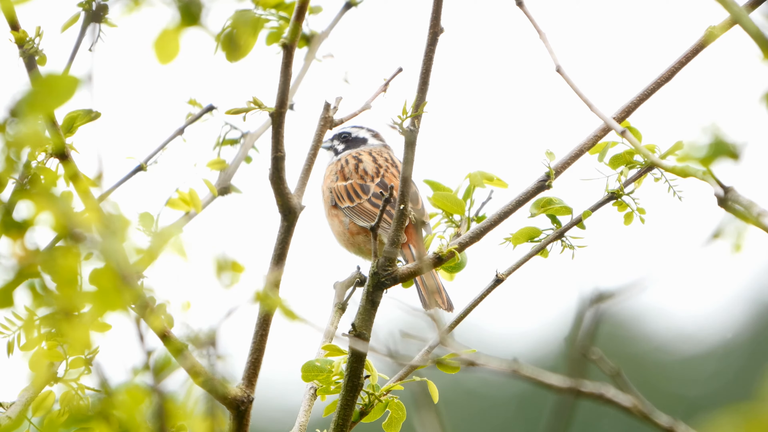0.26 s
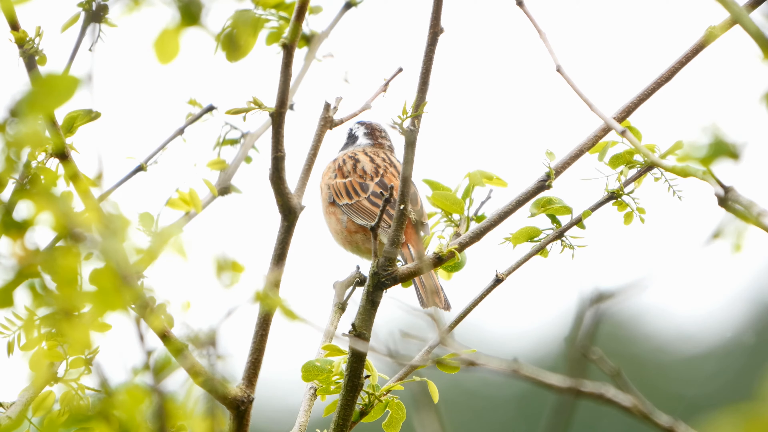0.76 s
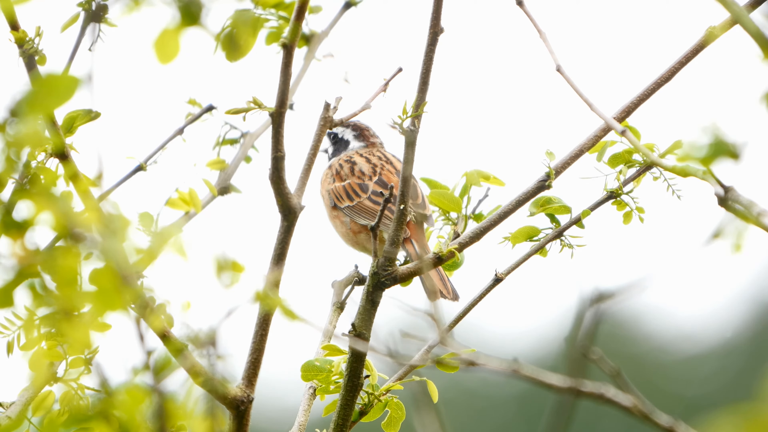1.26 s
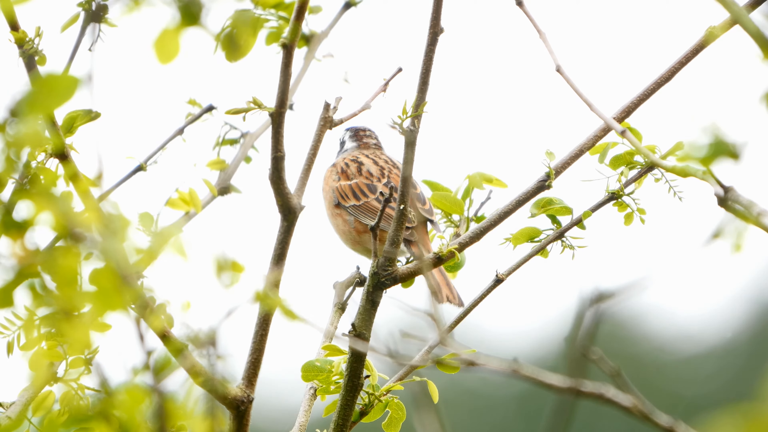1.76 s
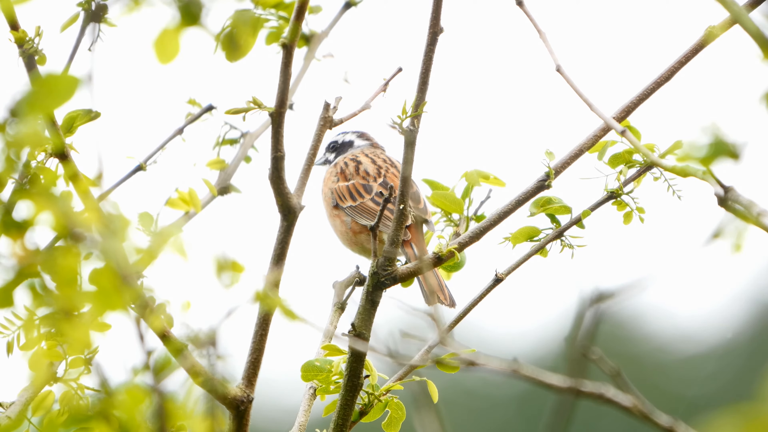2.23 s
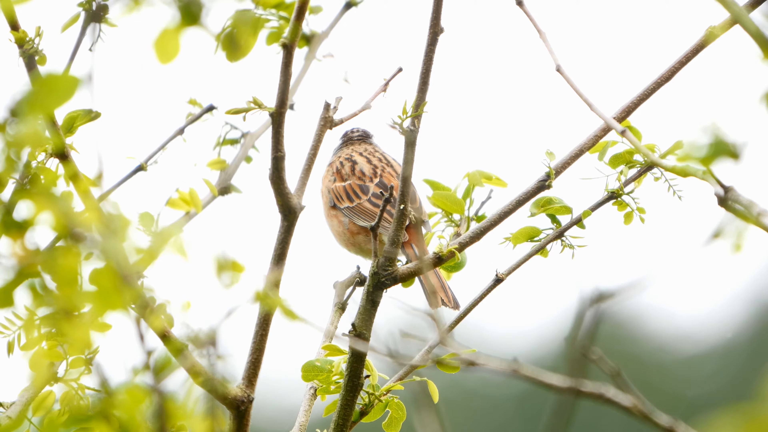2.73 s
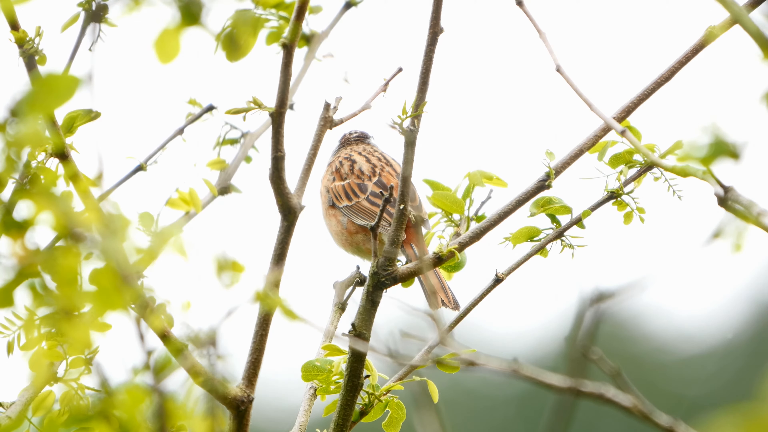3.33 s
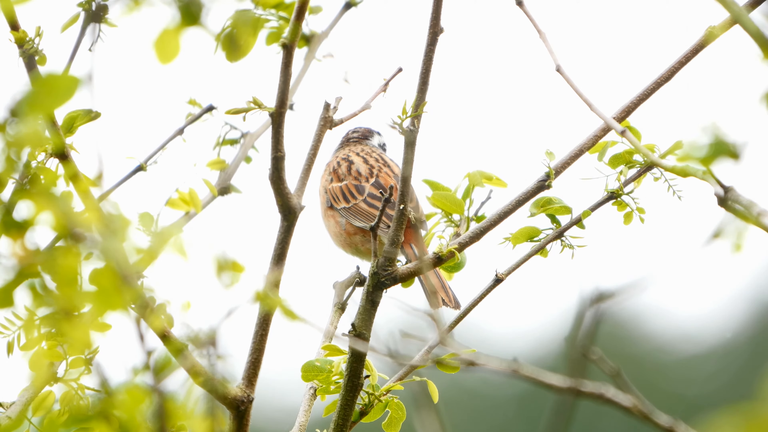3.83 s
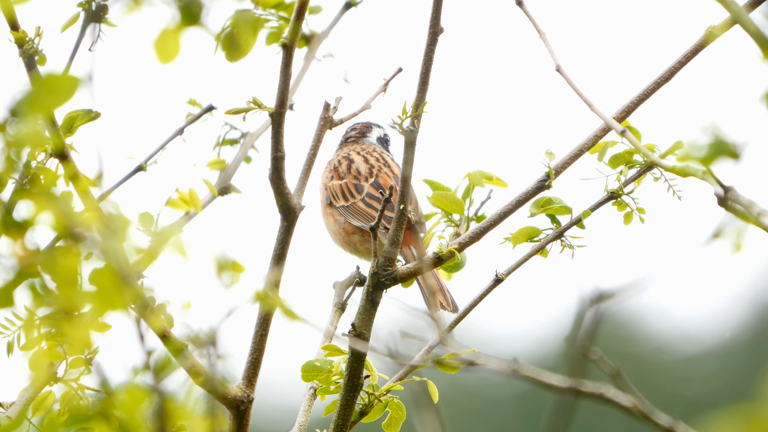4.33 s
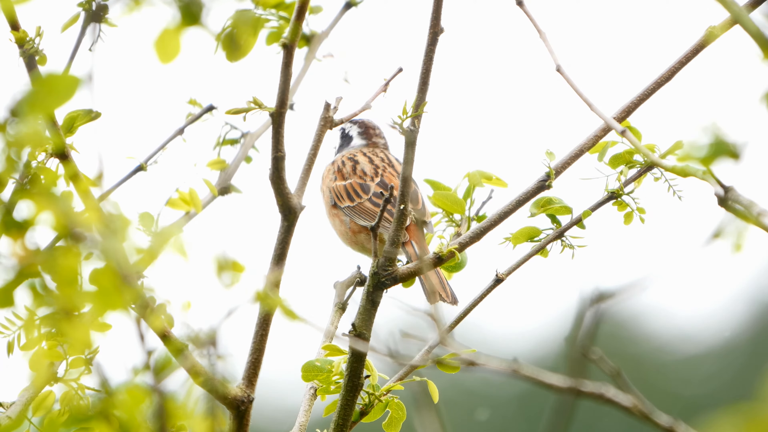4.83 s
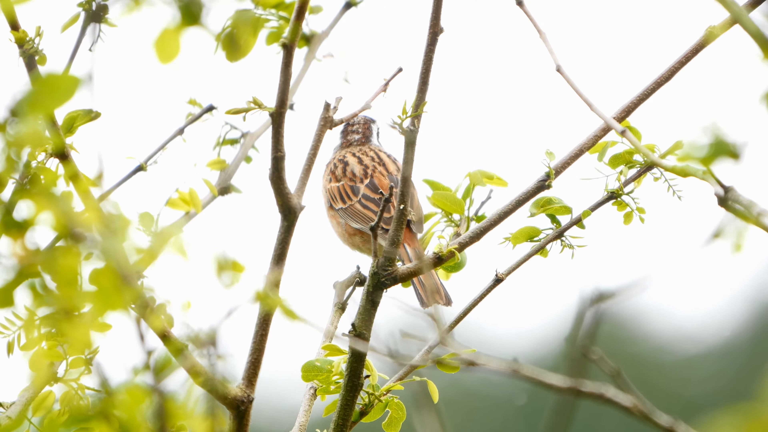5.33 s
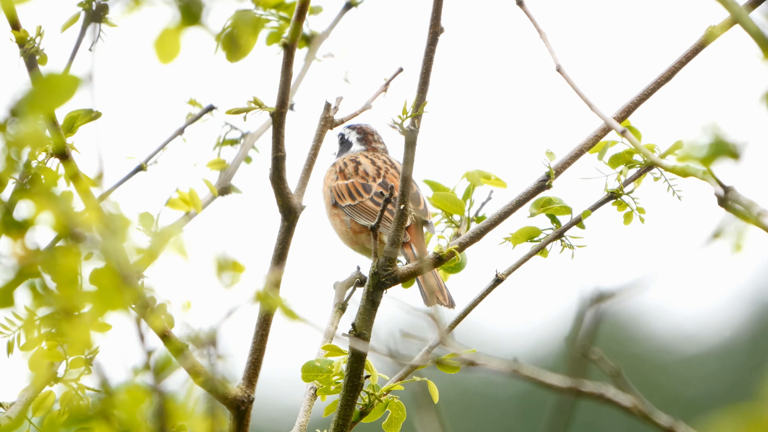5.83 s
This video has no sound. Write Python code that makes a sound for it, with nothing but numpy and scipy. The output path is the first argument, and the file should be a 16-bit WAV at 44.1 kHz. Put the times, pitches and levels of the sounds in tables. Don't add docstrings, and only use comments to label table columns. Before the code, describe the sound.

A quiet wooded valley, heard through one microphone: soft broad air hum, faint hiss, far traffic, a low drone and a blur of remote birdsong that slowly grows. At 0.4 s a small nearby bird begins with a chip, then an arched whistle, a downward slide and a strong, long sinking whistle at 0.8 s. Paired warbles and sharp peaks follow from 1.0 s, thin very high lisps around 1.3 s, then rising and hooked notes and a quick trill ending near 1.9 s. Trees leave a light smeared echo. From about 1.8 s farther birds whistle softly, with droops, plunges and arches; a distant vehicle swells around 2.5 s. From 3.75 s another bird pipes a regular, slowly rising row of low paired notes, while clearer arches sound until about 4.7 s. At 4.6 s the near bird repeats its bright phrase, reaching the trill around 6 s.

```python
import sys
import numpy as np
from scipy import signal
from scipy.fft import rfft, irfft, next_fast_len
from scipy.io import wavfile
from scipy.ndimage import uniform_filter1d

SR = 44100
rng = np.random.default_rng(int(sys.argv[2]) if len(sys.argv) > 2 else 0)


def store_pcm(level_fs):
    pcm = np.round(np.clip(level_fs, -1, 1) * 32767).astype(np.int16)
    wavfile.write(sys.argv[1], SR, np.atleast_2d(pcm).T)


def how_loud(loudness_db):
    steps = np.asarray(loudness_db, float) / 20
    return 10 ** steps


N = 268569

# time
# after the start in seconds [s], pitch [Hz], level under the syllable's peak [dB].
CHIP = [
    [(0, 5540, -31.5), (0.009, 5350, -9.5), (0.015, 4980, 0), (0.021, 4600, -3), (0.027, 4400, -5.5)],
]
ARCH = [
    [(0, 3680, -23), (0.019, 3920, -3.5), (0.035, 4120, -3.5), (0.049, 4180, 0), (0.06, 4283, -3),
     (0.067, 4175, -5.5), (0.073, 3940, -1.5), (0.081, 3600, -0.5)],
    [(0.082, 3640, -2), (0.085, 4890, -10.5), (0.089, 7200, -39)],
]
SLIDE = [
    [(0, 8150, -40), (0.013, 7270, -42), (0.025, 5980, -14), (0.043, 5610, -3.5), (0.073, 5262, 0.8),
     (0.097, 5103, -3.5)],
]
TICK = [
    [(-0.004, 4900, -16), (0.001, 5010, -1.5), (0.006, 5400, 0), (0.012, 5800, -5.5)],
]
LONG = [
    [(-0.003, 4500, -13.5), (0.001, 4900, -6), (0.01, 4286, -7.5), (0.03, 4010, -6.5), (0.065, 3680, 0.5),
     (0.105, 3640, -2.5), (0.13, 3450, -1), (0.142, 3260, -19)],
]
WARBLE = [
    [(0, 6160, -32), (0.012, 6010, -10.5), (0.021, 5540, -1.5), (0.03, 5380, 0), (0.038, 5130, 3),
     (0.047, 5020, -6)],
]
PEAK = [
    [(0, 4150, -10), (0.01, 4500, 3.5), (0.017, 5040, 1.5), (0.026, 4220, 1.2), (0.043, 3837, 0.5)],
]
LISP = [
    [(0, 7950, -23), (0.007, 7870, -9), (0.013, 7620, 0.5), (0.019, 6950, -25)],
    [(-0.001, 8320, -24), (0.007, 8560, -13), (0.013, 8860, -20)],
]
DART = [
    [(0, 10080, -22), (0.005, 7580, -3.5), (0.012, 7190, -4.5)],
]
RISE = [
    [(0, 4770, -24), (0.008, 4510, -10), (0.016, 4570, -6), (0.031, 4910, 1), (0.042, 5150, -1),
     (0.051, 5500, -3), (0.062, 5700, -6), (0.074, 5800, -10)],
]
HOOK = [
    [(0, 4720, -14), (0.005, 2680, -3), (0.009, 3560, -3), (0.016, 3740, -1), (0.022, 3620, 0),
     (0.027, 3100, -3), (0.034, 2200, -9)],
]
STEP = [
    [(-0.006, 6730, -30), (0.004, 6800, -10), (0.016, 6940, -2.5), (0.028, 7020, -2.5), (0.034, 6900, 1.5),
     (0.041, 6380, -2), (0.048, 6330, -2.5), (0.062, 6430, 0), (0.077, 6520, -7)],
]
TRILL = [
    [(0, 4460, -8), (0.004, 4480, -2), (0.008, 4460, 0), (0.012, 4200, -3), (0.017, 3740, -8)],
    [(0.011, 4470, -11), (0.015, 4470, -8), (0.022, 4450, -15)],
]
HOOP = [
    [(0, 10100, -21), (0.019, 9070, -7), (0.044, 8400, -3), (0.069, 8500, 1.5), (0.099, 9030, -4),
     (0.123, 9260, -10.5)],
]
SAGGING = [
    [(0, 4540, -13), (0.004, 4750, -5), (0.012, 4250, -5.5), (0.03, 3970, -3.5), (0.065, 3714, -2.5),
     (0.105, 3534, 2.5), (0.126, 3420, -9.5), (0.135, 3330, -15)],
]

# time
# after the start in seconds [s], pitch [Hz], level under the call's peak [dB].
BOW = [
    [(0, 3115, -13), (0.011, 3780, -2.5), (0.034, 4067, -1), (0.056, 4160, -1), (0.075, 4060, 3.5),
     (0.091, 3750, -1), (0.106, 3015, -5)],
]
STAIRS = [
    [(0, 6420, -11), (0.016, 6650, -14)],
    [(0.068, 7100, -14), (0.073, 4800, -6), (0.079, 2900, 0)],
]
CLIMB = [
    [(0, 2530, -3), (0.014, 3180, -5), (0.04, 3720, 1.5), (0.064, 4070, -4), (0.075, 3960, 0),
     (0.085, 3640, 4)],
]
DROOP = [
    [(0, 3150, -3), (0.03, 3156, -3), (0.05, 2720, -2), (0.068, 2468, -2)],
]
PLUNGE = [
    [(0, 4300, -18), (0.009, 3130, 3), (0.018, 2500, 1.5), (0.036, 1826, -4)],
]
LEAP = [
    [(0.002, 2430, 5), (0.005, 2550, 5), (0.011, 3100, -1), (0.017, 3750, 3), (0.02, 4500, -13),
     (0.025, 5600, -16)],
]
CURL = [
    [(0, 3010, 7), (0.013, 2220, 3), (0.023, 2600, -4.5), (0.033, 2240, -5)],
]
KINKED = [
    [(0, 3020, -6), (0.008, 3860, -1), (0.024, 3950, 1), (0.042, 4380, -4), (0.065, 4430, 2),
     (0.085, 4150, 1.5), (0.105, 3660, -2), (0.113, 3220, -11)],
]
SLOPE = [
    [(0, 3100, -6), (0.03, 3450, 0), (0.064, 4300, -4), (0.08, 4400, -1), (0.091, 4320, -10)],
]
SWOOP = [
    [(0, 2770, -13), (0.007, 3020, -1), (0.014, 3240, 0), (0.022, 3340, -1)],
]


def along(points, hz):
    f, v = np.transpose(points)
    return np.interp(np.log(hz + 1), np.log(f + 1), v)


def noise(gain, patchy_db):
    z = signal.stft(rng.standard_normal(N + 512), nperseg=512)[2]
    field = uniform_filter1d(rng.standard_normal(z.shape), size=5, axis=0)
    field = uniform_filter1d(field, size=12, axis=1)
    patchy = signal.istft(z * how_loud(patchy_db * field / field.std()), nperseg=512)[1][:N]
    m = next_fast_len(N)
    coloured = irfft(rfft(patchy, m) * gain(np.fft.rfftfreq(m, 1 / SR)), m)[:N]
    return coloured / coloured.std()


def flutter(top_hz, depth_db):
    return how_loud(depth_db * noise(lambda hz: hz < top_hz, patchy_db=0.0))


def swell(centre_s, width_s, db):
    return db * np.exp(-((np.arange(N) / SR - centre_s) / width_s) ** 2)


def hump(centre_hz, width_hz):
    return lambda hz: np.exp(-((hz - centre_hz) / width_hz) ** 2)


def valley():
    # frequency [Hz], level [dB per Hz].
    hum_spectrum = [(15, -51.5), (25, -34.5), (70, -10.5), (110, -9), (165, -7.5), (222, -15), (261, -4.5),
                    (436, -8.5), (978, -3.5), (1250, -7.5), (1470, -7.5), (2880, -15), (3980, -25),
                    (6640, -32), (15700, -38.5)]
    # centre [s], width [s], height [dB].
    drone_swells = [
        (2.76, 0.1, 5),
        (3.82, 0.086, 9.5),
        (0.92, 0.22, 1),
        (5.53, 0.4, 5.5),
    ]
    # centre [s], width [s], height [dB].
    chorus_swells = [
        (1, 0.12, 0),
        (5, 0.32, 0.5),
        (-3.7, 0.4, -2.5),
        (6, 0.13, -9),
    ]

    hum = how_loud(-46) * noise(lambda hz: how_loud(along(hum_spectrum, hz)), patchy_db=0.9)

    vehicle_db = swell(centre_s=2.53, width_s=0.39, db=8.5)
    traffic = how_loud(-60.5 + vehicle_db) * noise(hump(220, 77), patchy_db=0.5)

    drone_db = -61 + sum(swell(*row) for row in drone_swells)
    drone = how_loud(drone_db) * noise(hump(317.3, 26), patchy_db=2.0)

    grows_db_per_s = 0.97
    chorus_db = -56.5 + grows_db_per_s * np.arange(N) / SR + sum(swell(*row) for row in chorus_swells)
    chorus = how_loud(chorus_db) * noise(hump(2685, 1050), patchy_db=3)
    return hum + traffic + drone + chorus


def wood(x, wet_db, onset_s, depth, stir_db):
    # frequency [Hz], time to fall by 60 dB [s].
    decay = [
        (2000, 0.29),
        (4000, 0.75),
        (6500, 0.61),
        (9000, 0.085),
    ]
    hz, t, z = signal.stft(rng.standard_normal(SR), SR, nperseg=128)
    t60_s = depth * along(decay, hz)[:, None]
    tail = signal.istft(z * how_loud(-60 * t / t60_s), SR, nperseg=128)[1]
    tail *= 1 - np.exp(-np.arange(len(tail)) / SR / onset_s)
    tail *= flutter(200, 1.5)[:len(tail)]
    scatter = signal.fftconvolve(x, tail / np.linalg.norm(tail))[:N]
    return how_loud(wet_db) * flutter(170, stir_db) * scatter


def sung(shape, rows):
    return [np.array(stroke) * [length, pitch, 1] + [s, 0, db]
            for s, db, pitch, length in rows for stroke in shape]


def add_whistle(out, note, edge_s, glide_s, octave_db, warble_hz=0):
    s, hz, db = np.transpose(note)
    i = np.arange(int((s[0] - edge_s) * SR), min(N, int((s[-1] + edge_s) * SR)))
    t = i / SR
    age = t - s[0]
    pitch = uniform_filter1d(np.interp(t, s, hz), int(glide_s * SR) + 1, mode="nearest")
    warble_fade = np.clip((0.026 - age) / 0.02, 0, 1)
    pitch += warble_hz * np.cos(2 * np.pi * 188 * (age - 0.004)) * warble_fade
    phase = 2 * np.pi * np.cumsum(pitch) / SR

    to_edge_s = np.minimum(age + edge_s, s[-1] + edge_s - t)
    fade = np.sin(np.pi / 2 * np.clip(to_edge_s / (2 * edge_s), 0, 1)) ** 2
    beak_top_hz = 8600
    octave = how_loud(octave_db) / (1 + (2 * pitch / beak_top_hz) ** 20)
    out[i] += fade * how_loud(np.interp(t, s, db)) * (np.sin(phase) + octave * np.sin(2 * phase))


def whistler_notes():
    # call shape, then rows of start [s], peak level [dB], pitch ratio [1], length ratio [1].
    calls = [
        (BOW, [(3.52, -42.5, 0.99, 0.93), (4.024, -41.5, 1, 1), (4.303, -43, 1.008, 1)]),
        (KINKED, [(4.577, -42, 1.001, 1.001)]),
        (SLOPE, [(3.8, -51, 1.001, 1.001)]),
        (SWOOP, [(6.071, -38, 1.001, 1.001)]),
        (CURL, [(3.62, -44, 1.01, 1.001), (4.132, -45, 1.01, 1.2), (4.41, -49, 1.01, 1.1), (4.694, -49, 1.06, 0.7)]),
        (LEAP, [(3.28, -44, 1.001, 1.001), (3.789, -48, 0.99, 1.05)]),
        (STAIRS, [(3.322, -51, 1, 1), (3.837, -50, 1, 1)]),
        (CLIMB, [(2.885, -47, 1.001, 1.001)]),
        (DROOP, [(1.94, -44.5, 1.01, 0.95), (2.535, -45, 0.995, 0.98)]),
        (PLUNGE, [(2.11, -41, 1.001, 1.001)]),
    ]
    return [note for shape, rows in calls for note in sung(shape, rows)]


def glide_notes():
    # start [s], length [s], first pitch [Hz], last pitch [Hz], peak level [dB].
    glides = [(1.348, 0.053, 3240, 2870, -45.5), (1.997, 0.022, 4820, 5480, -55),
              (2.025, 0.06, 3680, 4600, -52), (2.0, 0.02, 3250, 3600, -56), (2.645, 0.035, 2750, 2500, -50),
              (2.98, 0.013, 2300, 4200, -52), (3.047, 0.007, 2430, 2750, -50),
              (3.061, 0.007, 2700, 3050, -51), (3.078, 0.007, 2950, 3400, -50),
              (3.095, 0.011, 3350, 3800, -51), (3.133, 0.013, 4600, 3500, -55),
              (3.676, 0.025, 4150, 4570, -55), (4.03, 0.09, 5880, 4500, -59),
              (4.125, 0.07, 4450, 3980, -57), (4.91, 0.03, 6400, 6950, -66),
              (5.159, 0.035, 6180, 7100, -64), (5.571, 0.01, 3500, 2900, -52),
              (5.592, 0.038, 2520, 3230, -46), (5.418, 0.013, 2300, 2900, -46),
              (3.81, 0.012, 4650, 5250, -58), (3.824, 0.014, 5400, 5520, -54),
              (3.87, 0.03, 7100, 7850, -70), (4.675, 0.015, 2700, 3300, -50)]
    return [[(s, hz, db), (s + length, to_hz, db)] for s, length, hz, to_hz, db in glides]


def level_notes():
    # start [s], length [s], pitch [Hz], peak level [dB].
    steady = [(1.822, 0.041, 2580, -52), (1.922, 0.072, 4620, -63), (2.041, 0.044, 3120, -50.5),
              (5.563, 0.013, 3675, -48), (5.638, 0.04, 3070, -48), (2.146, 0.038, 3640, -51.5),
              (2.158, 0.075, 2910, -53), (2.275, 0.055, 3540, -55), (2.35, 0.035, 3500, -63),
              (2.41, 0.11, 2550, -55), (2.455, 0.022, 3500, -64), (3.088, 0.004, 3750, -52),
              (3.122, 0.008, 4600, -54), (3.034, 0.0085, 4600, -53), (3.188, 0.072, 3070, -55),
              (4.347, 0.042, 2560, -50.5), (4.47, 0.058, 4200, -54.5), (4.727, 0.062, 3253, -48),
              (3.639, 0.046, 4120, -71)]
    return [[(s, hz, db + 1), (s + length, hz, db - 1)] for s, length, hz, db in steady]


def pipe_notes():
    # start [s], peak level [dB].
    pipes = [(3.75, -55), (3.855, -52.5), (3.96, -55), (4.065, -49.5), (4.175, -51), (4.285, -47),
             (4.395, -46.5), (4.505, -47), (4.61, -47.5), (4.72, -48), (4.83, -51.5), (4.941, -51),
             (5.045, -50), (5.16, -52), (5.275, -51), (5.37, -50), (5.5, -52), (5.62, -47.5), (5.745, -50),
             (5.85, -52.5)]
    first_hz, settles_hz, settle_s, creeps_hz_per_s = 1724, 78.7, 0.37, 29.8
    answer_s, answer_hz, answer_db = 0.05, 109, -6
    notes = []
    for s, db in pipes:
        age = s - pipes[0][0]
        hz = first_hz + settles_hz * (1 - np.exp(-age / settle_s)) + creeps_hz_per_s * age
        pipe = np.array([(s, hz, db + 4.0), (s + 0.041, hz + 190, db + 0.5)])
        notes += [pipe, pipe + [answer_s, answer_hz, answer_db]]
    return notes


def far_birds():
    clear, faint, scattered = np.zeros(N), np.zeros(N), np.zeros(N)
    for note in whistler_notes() + glide_notes() + level_notes() + pipe_notes():
        distance_db = np.clip(-40 - np.max(np.transpose(note)[2]), 0, 12)
        share = distance_db / 80
        clear_db = 10 * np.log10(1.01 - share)
        faint_db = 10 * np.log10(0.01 + share)
        add_whistle(clear, note + np.array([0, 0, clear_db]), edge_s=0.004, glide_s=0.005, octave_db=-40)
        add_whistle(faint, note + np.array([0, 0, faint_db]), edge_s=0.004, glide_s=0.005, octave_db=-40)
        add_whistle(scattered, note + np.array([0, 0, 0.25 * distance_db]),
                    edge_s=0.006, glide_s=0.005, octave_db=-40)
    torn = noise(lambda hz: hz < 160, patchy_db=0) * faint
    echo = wood(scattered, wet_db=-12, onset_s=0.004, depth=0.85, stir_db=2.5)
    return flutter(90, 1.5) * clear + torn + echo


def bunting():
    # syllable, then rows of start [s], peak level [dB], pitch ratio [1], length ratio [1].
    opening = [
        (CHIP, [(0.383, -31.5, 1.01, 0.99), (4.641, -31, 0.99, 0.67)]),
        (ARCH, [(0.538, -25, 1.01, 0.99), (4.79, -25, 1, 0.96)]),
        (SLIDE, [(0.607, -27, 0.99, 1), (4.86, -27, 1, 1)]),
        (TICK, [(0.786, -31, 0.997, 1.001), (5.043, -33, 0.994, 0.93)]),
        (LONG, [(0.795, -21.5, 0.99, 1)]),
        (SAGGING, [(5.051, -22, 0.99, 1.04)]),
    ]
    middle = [
        (WARBLE, [(0.983, -27.5, 1, 0.96), (1.118, -29, 1.002, 0.98), (5.235, -27.5, 1.005, 0.96), (5.373, -28, 1.003, 0.9)]),
        (PEAK, [(1.033, -27, 1.025, 1), (1.171, -27.5, 1, 0.92), (5.285, -27.5, 1.008, 0.96), (5.425, -28, 1.001, 0.85)]),
        (LISP, [(1.259, -34.5, 0.99, 1.2), (1.323, -35, 0.97, 1.8), (5.512, -34.5, 0.99, 1.08), (5.575, -32.5, 0.98, 0.98)]),
        (DART, [(1.279, -32, 1.03, 0.85), (1.342, -31.5, 1.03, 1.001), (5.532, -33.5, 1.05, 0.72), (5.594, -31, 1.03, 0.86)]),
    ]
    closing = [
        (RISE, [(1.389, -24.5, 1.001, 0.97), (5.641, -26.5, 1.005, 1.03)]),
        (HOOK, [(1.464, -26, 1.007, 0.96), (5.717, -25.5, 1.005, 1.001)]),
        (STEP, [(1.539, -29.5, 1, 0.96), (5.797, -30.5, 1.012, 0.95)]),
        (TRILL, [(1.63, -30.5, 1, 0.97), (1.688, -29.5, 1.012, 0.95), (1.743, -29.5, 0.985, 1.06), (5.889, -30, 0.993, 1), (5.947, -30.5, 0.98, 1.03), (6.0, -28.5, 0.978, 1)]),
        (HOOP, [(1.821, -44.5, 1.005, 0.97)]),
    ]
    # first song [dB], second song [dB].
    head_octave_db = (-38.5, -65)
    # delay [s], level [dB].
    trunks = [
        (.0045, -21),
        (.0085, -22),
        (.0115, -19),
        (.021, -17.5),
        (.029, -15),
    ]

    voice = np.zeros(N)
    for shape, rows in opening + middle + closing:
        weaker_db = 0 if shape in (LONG, SAGGING) else 18
        warble_hz = 750 if shape == WARBLE else 0
        for note in sung(shape, rows):
            song = int(note[0, 0] > 3)
            add_whistle(voice, note, edge_s=0.001207, glide_s=0.004,
                        octave_db=head_octave_db[song] - weaker_db, warble_hz=warble_hz)
    near = sum(how_loud(db) * np.roll(voice, int(s * SR)) for s, db in trunks)
    bushes = wood(voice, wet_db=-12.5, onset_s=0.0021, depth=0.07, stir_db=-3.5)
    trees = wood(voice, wet_db=-13.0, onset_s=0.0058, depth=0.57, stir_db=1.5)
    return voice + uniform_filter1d(near, size=4) + bushes + trees


def scene():
    return (valley() + far_birds() + bunting())[None]


def roll_off(x):
    return signal.sosfilt(signal.butter(12, 15880, fs=SR, output="sos"), x)


def record(dry):
    top_hz = 15850
    mix = irfft(rfft(dry) * (np.fft.rfftfreq(N, 1 / SR) < top_hz), N)
    return roll_off(mix)


dry = scene()
out = record(dry)
store_pcm(out)
```